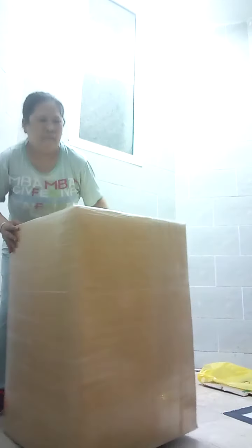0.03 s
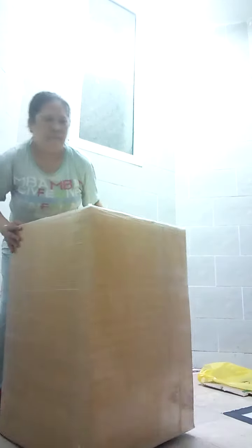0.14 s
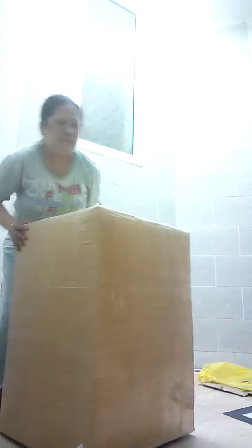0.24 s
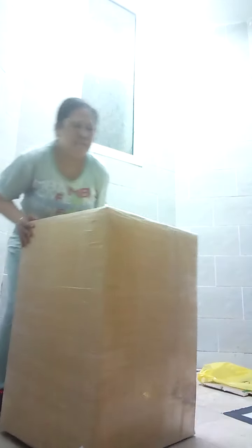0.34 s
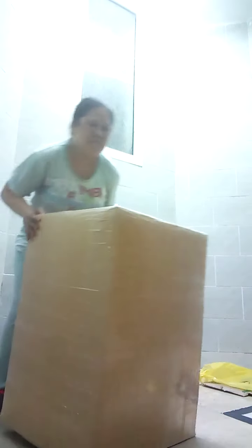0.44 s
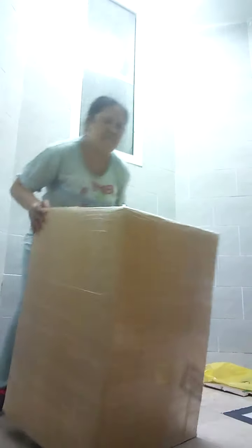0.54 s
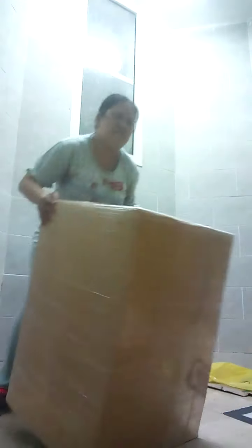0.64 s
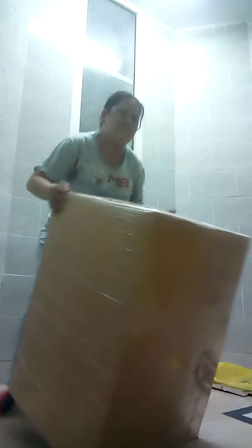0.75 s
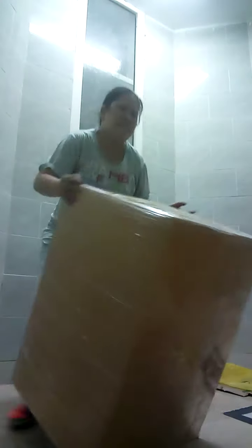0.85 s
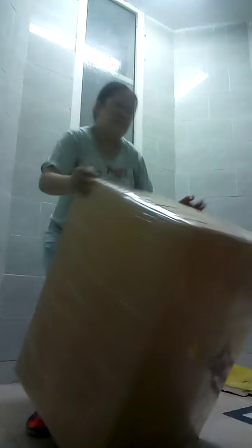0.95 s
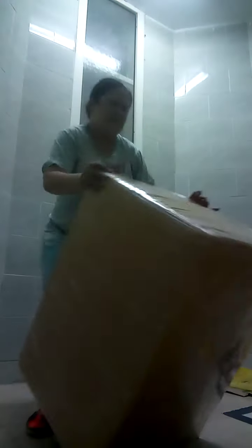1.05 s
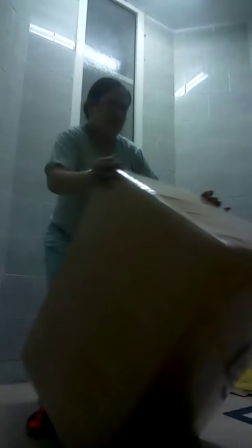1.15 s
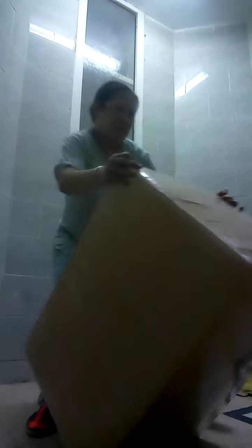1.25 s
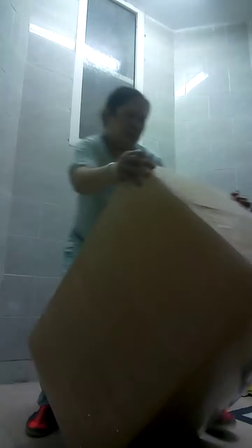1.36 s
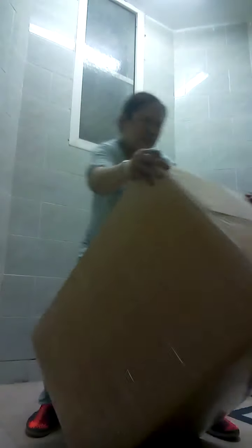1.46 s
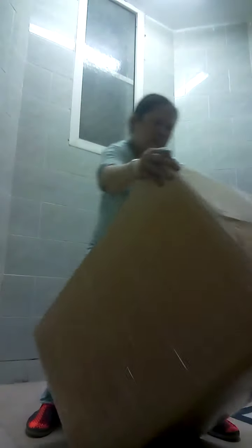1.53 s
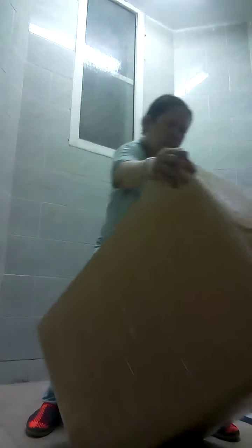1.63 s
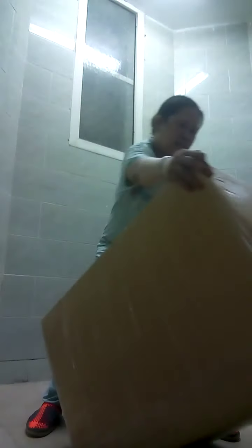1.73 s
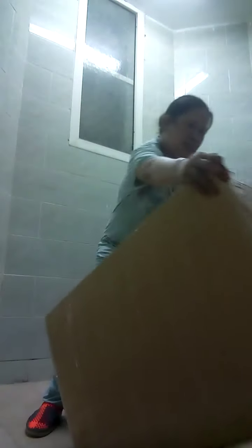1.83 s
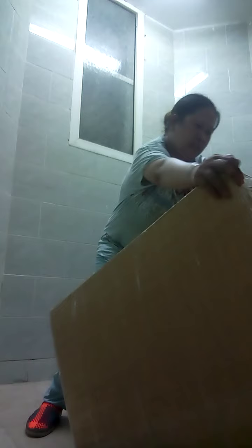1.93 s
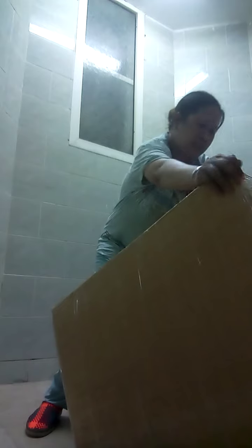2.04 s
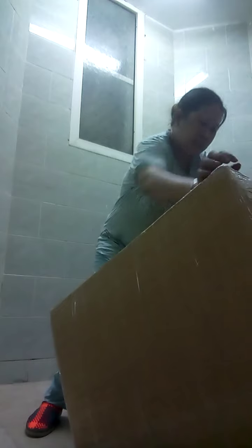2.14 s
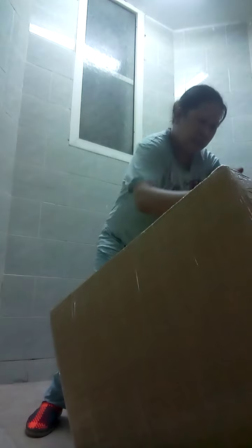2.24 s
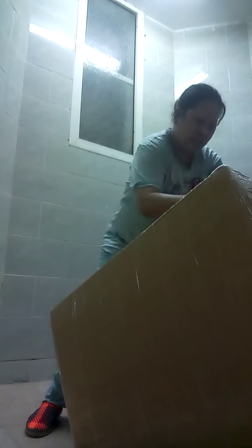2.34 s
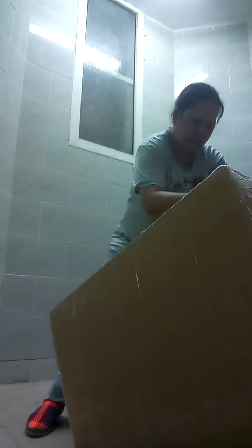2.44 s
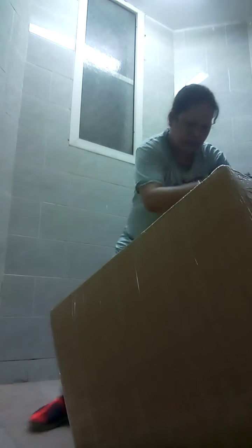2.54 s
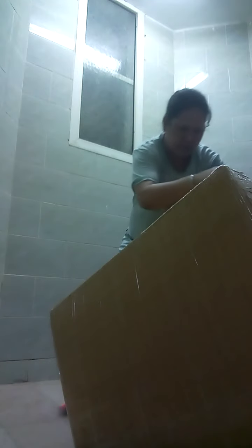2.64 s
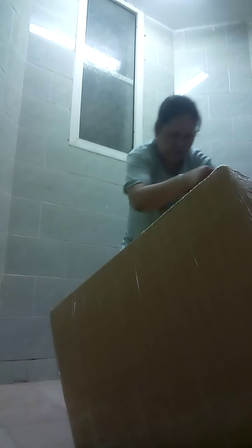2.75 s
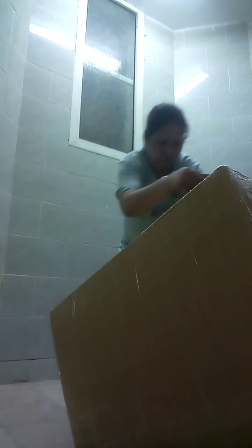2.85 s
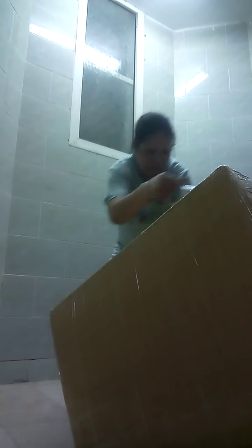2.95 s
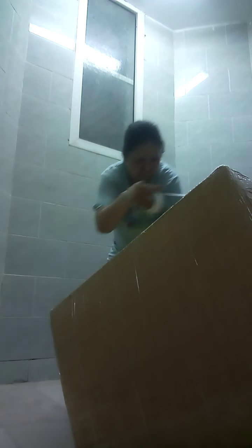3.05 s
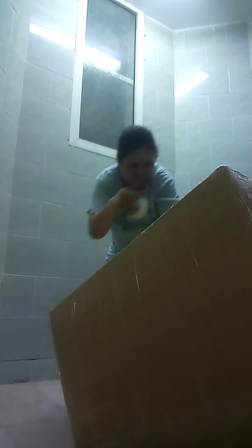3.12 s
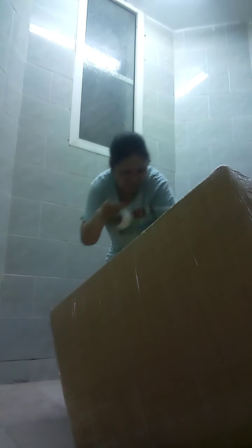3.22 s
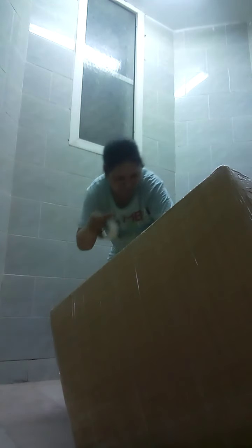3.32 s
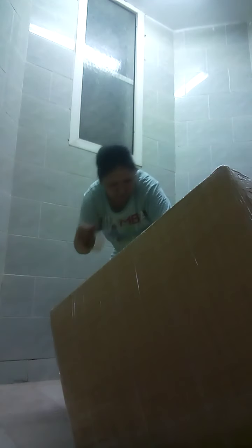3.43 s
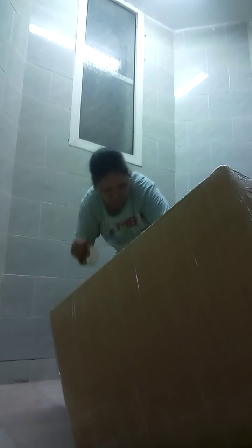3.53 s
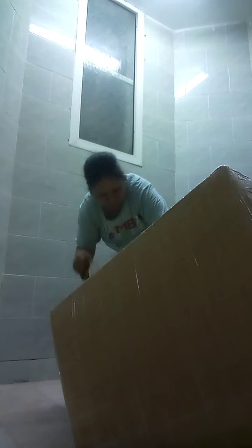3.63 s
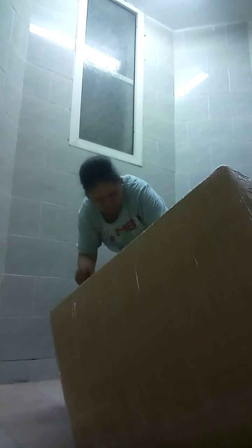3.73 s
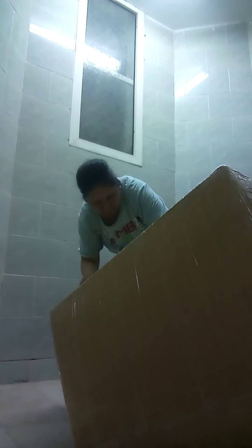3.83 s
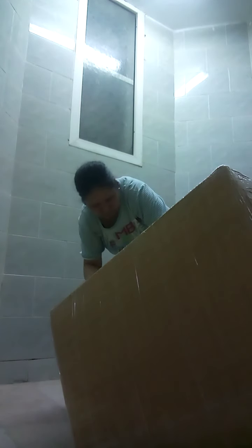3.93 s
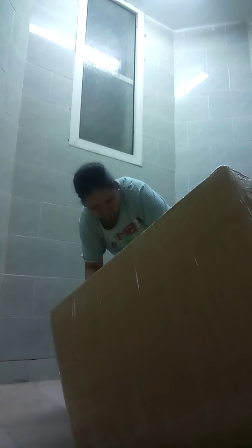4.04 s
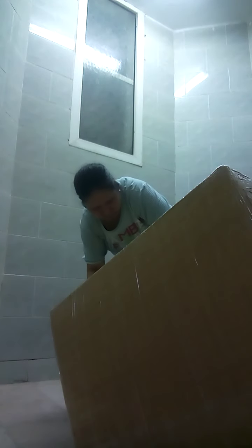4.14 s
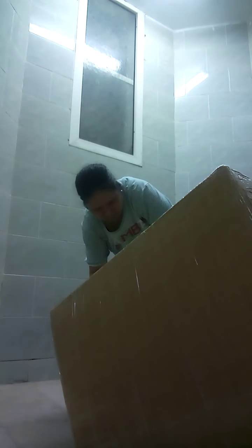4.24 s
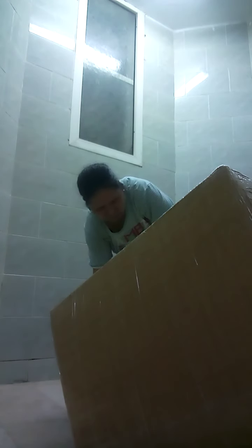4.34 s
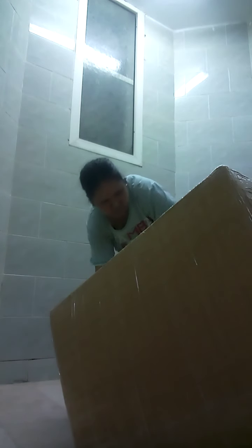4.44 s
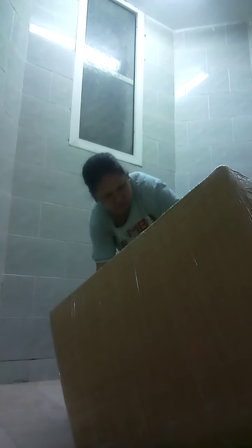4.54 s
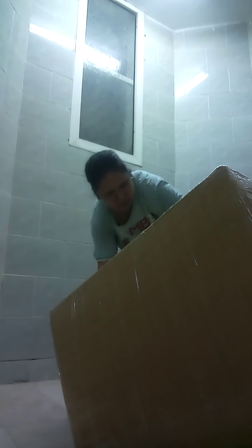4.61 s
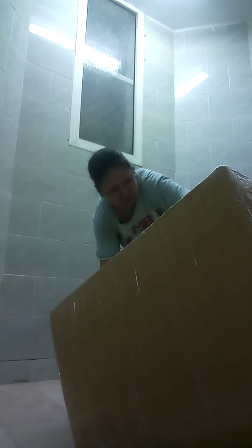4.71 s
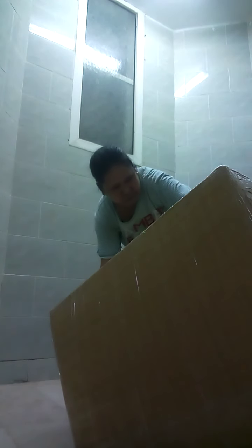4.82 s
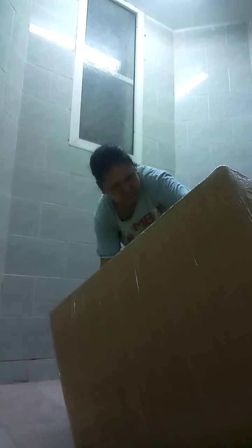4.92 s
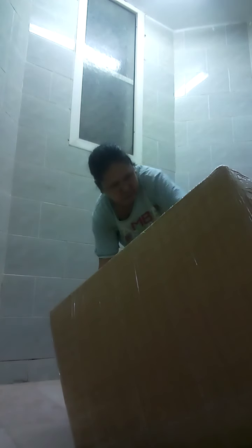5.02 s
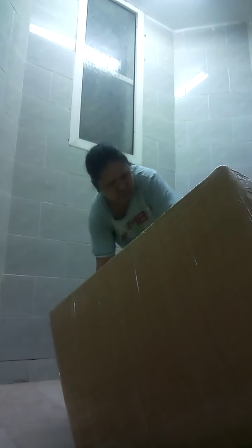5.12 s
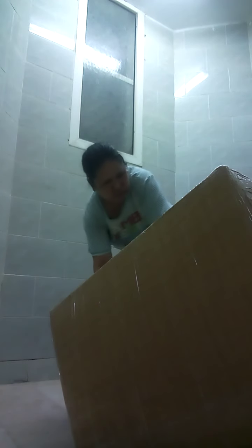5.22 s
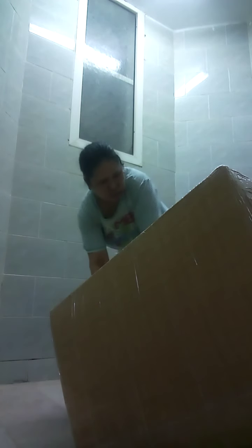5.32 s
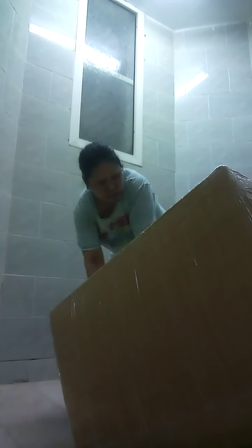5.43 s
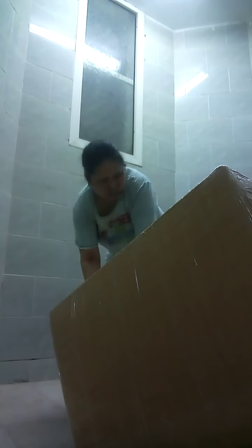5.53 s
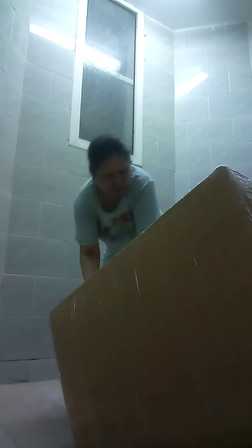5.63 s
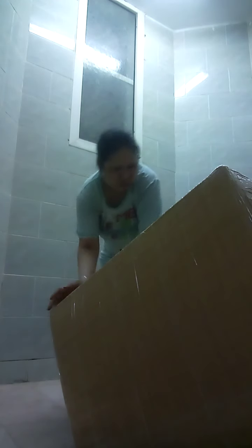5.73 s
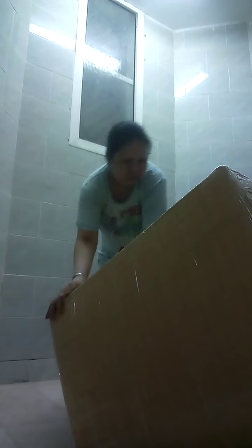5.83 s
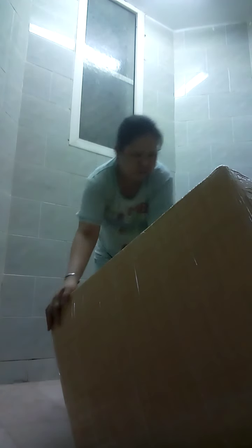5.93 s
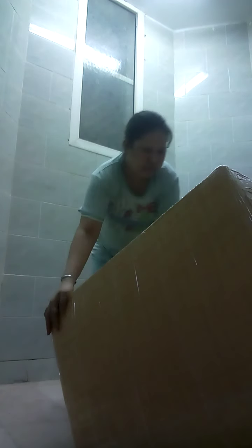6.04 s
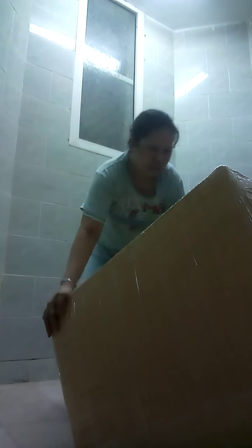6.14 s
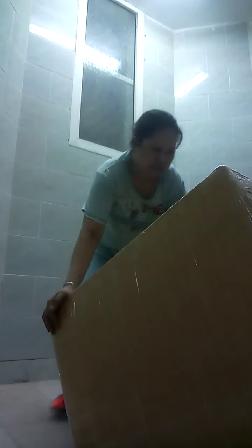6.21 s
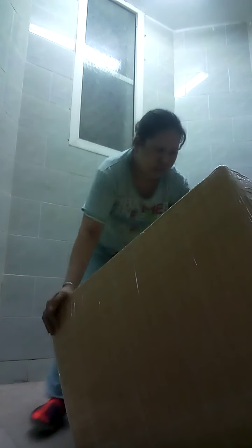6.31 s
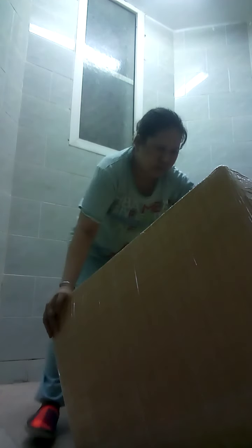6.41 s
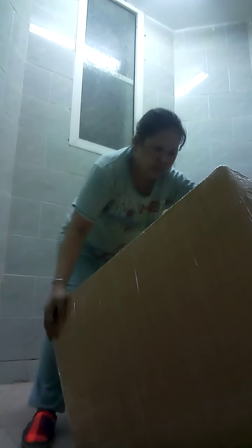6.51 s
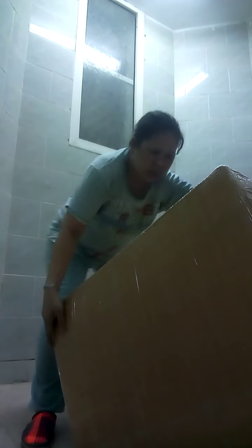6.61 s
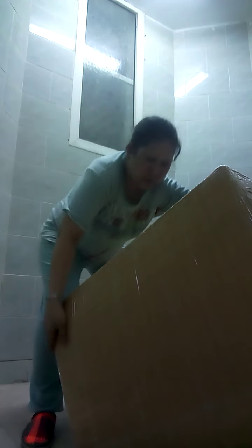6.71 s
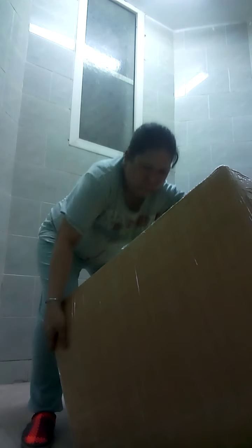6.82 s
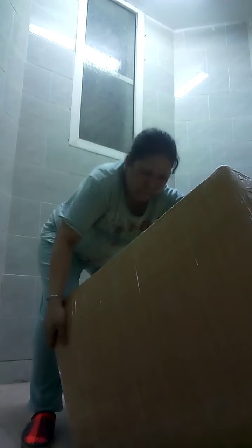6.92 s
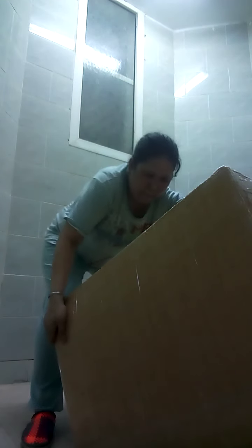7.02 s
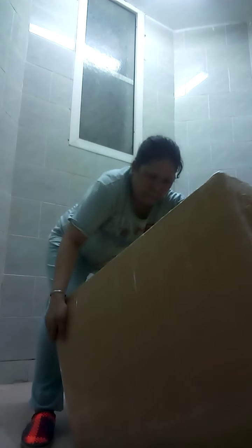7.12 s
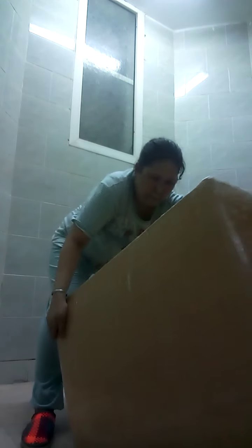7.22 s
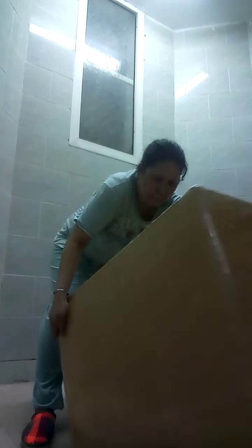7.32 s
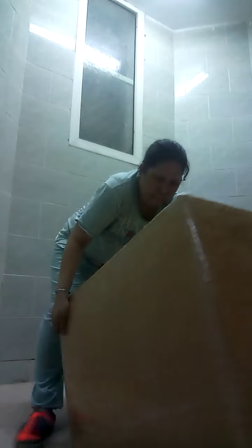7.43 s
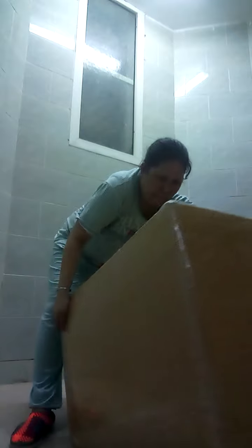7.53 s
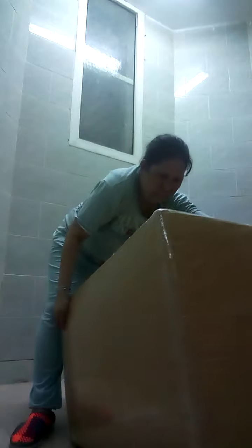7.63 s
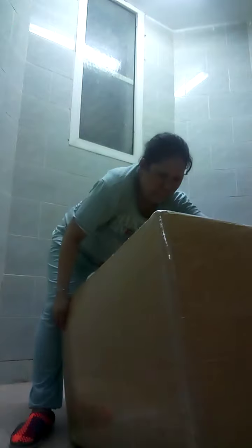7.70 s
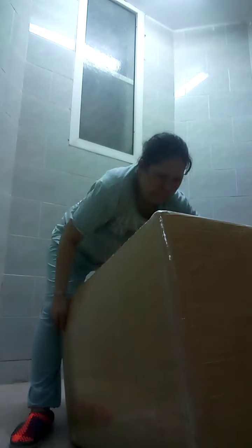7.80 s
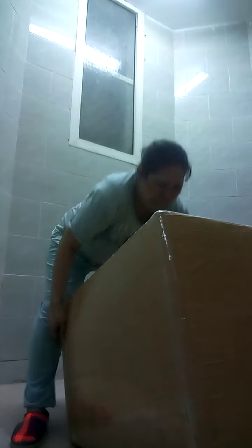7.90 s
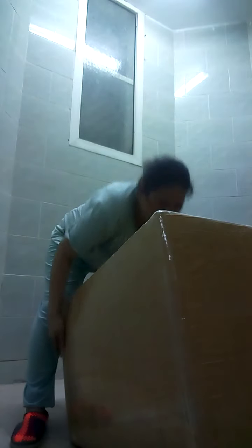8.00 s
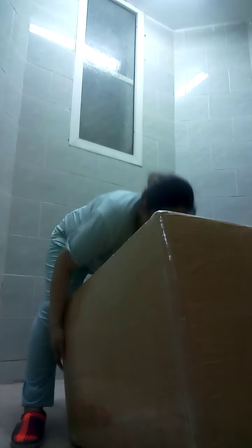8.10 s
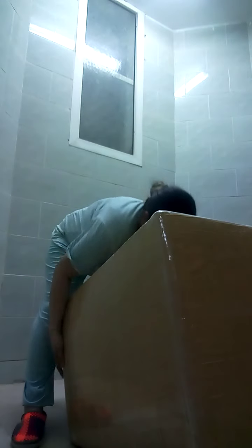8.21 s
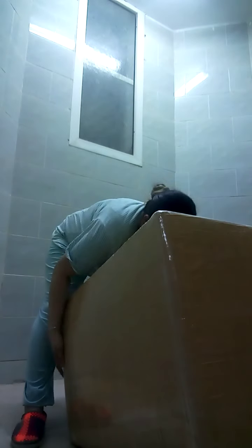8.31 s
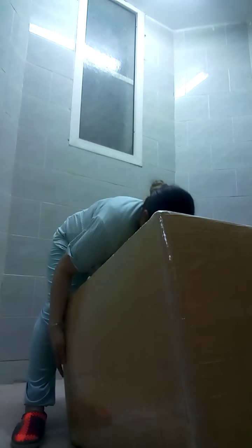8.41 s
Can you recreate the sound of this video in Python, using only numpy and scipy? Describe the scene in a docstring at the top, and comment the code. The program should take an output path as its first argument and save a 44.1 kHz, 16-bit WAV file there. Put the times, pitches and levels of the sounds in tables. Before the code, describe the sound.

A big cardboard box thumps down in an echoing tiled room, packing tape screeches off a roll, then hands rub and drag the box.

```python
"""A big tape-wrapped cardboard box is tipped over in a hard tiled room; its edge thumps on the floor
and rings the hollow card. Packing tape then screeches off the roll by stick-slip, in one long and one
short pull, and a limiter ducks everything under it. Hands smooth the tape down, so the film hisses and
crackles with friction, and at last the box is dragged round, its panels rumbling.
Throughout, the tiles reverberate and a low hum fills the room."""
import sys
import numpy as np
from scipy import signal
from scipy.fft import rfft, irfft, next_fast_len
from scipy.io import wavfile
from scipy.ndimage import uniform_filter1d, map_coordinates

SR = 44100
rng = np.random.default_rng(int(sys.argv[2]) if len(sys.argv) > 2 else 0)


def dump(signal):
    """Clip the signal to [-1, 1] and save it as 16-bit WAV at the path in sys.argv[1]."""
    limited = np.clip(np.atleast_2d(signal).T, -1, 1)
    pcm = np.round(limited * 32767).astype(np.int16)
    wavfile.write(sys.argv[1], SR, pcm)


N = 373086
TIME = np.arange(N) / SR

# Spectrum of the plastic film, rubbed or cracking. Each row: frequency in Hz, level in dB.
FILM_SPECTRUM = [(800, -58), (2000, -8.5), (3500, -2.5), (6500, 0.5), (10000, 1), (16000, 0.5)]


def tape(slips_per_s=1300, half_rate_m=0.19, wave_m_per_s=108, sizzle_hz=10000):
    """Stick-slip: glue lets go in uneven jumps; a longer strip slips more slowly and rings lower."""
    # Spectrum of the tearing glue. Each row: frequency in Hz, level in dB.
    glue_spectrum = [(100, 1.5), (300, 6.5), (700, 3.5), (1500, 2.5), (2500, 1.5), (4000, 1), (7000, 1),
                     (11000, 1), (16000, 1)]
    # The tape jerks free. Each row: time in seconds, level in dB.
    jerks = [(2.851, -7), (3.331, -3), (3.343, 0), (3.366, -6), (3.379, -3), (3.394, -6), (3.412, -21),
             (3.421, -6), (3.4555, 3), (3.458, -6.5), (3.575, -6.5), (3.678, -9), (3.781, -12),
             (4.0305, -7), (4.05, -19), (4.129, -2.5)]
    pull_db, strip_m, _ = pulling(TIME)
    slip_rate = slips_per_s / (1 + (strip_m / half_rate_m) ** 2)
    scatter = np.exp(0.3 * wobble(300) + 0.2 * wobble(12))
    count = np.floor(np.cumsum(slip_rate * scatter) / SR)
    slips = np.diff(count, prepend=0) * amp(5.3 * np.clip(rng.standard_normal(N), -2, 2))
    # Each slip tears a short row of glue threads.
    tearing = signal.lfilter([1], [1, -np.exp(-1 / (0.00055 * SR))], slips) * rng.standard_normal(N)
    fizz = grains(rate=8000, spread_db=4.0)
    peel = coloured(unit(tearing) + fizz, glue_spectrum) * amp(pull_db + 1.14 * wobble(70))
    hz, t, spectra = signal.stft(peel + snaps(jerks, decay_s=0.031), SR, nperseg=512, noverlap=384)
    _, strip_m, sizzle_db = pulling(t)
    order = hz[:, None] * 2 * strip_m / wave_m_per_s  # standing waves lie at whole numbers
    radiated = order ** 3 / np.sqrt(order ** 6 + 3)
    modes_db = 4.5 * np.cos(2 * np.pi * order) * np.exp(-order / 4)  # upper modes blur together
    strip = radiated * amp(modes_db) + 0.23  # some sound bypasses the strip
    treble = hz[:, None] ** 8 / (hz[:, None] ** 8 + sizzle_hz ** 8)
    return signal.istft(spectra * strip * amp(treble * sizzle_db), SR, nperseg=512, noverlap=384)[1][:N]


def pulling(t, grab_s=0.0057, sag_db_per_s=9.5):
    """The free strip grows at hand speed until the pull fades: level dB, length m and sizzle dB at t."""
    # Pulls on the tape. Each row: start in seconds, steady time in seconds, level in dB, fade in dB per
    # second, starting strip length in metres, hand speed in metres per second, sizzle in dB.
    pulls = np.array([(2.422, 0.0043, -30.5, 508, 0.048, 0.071, -9), (2.465, .87, -6, 80, .048, .37, 0.5),
                      (3.81, .05, -37.5, 232, 0.35, 0.017, -2), (4.03, .012, -21.5, 327, .008, .01, -8.5),
                      (4.145, 0.17, -31.5, 85, .065, .5, 3)])
    latest = np.maximum(np.searchsorted(pulls[:, 0], t, "right") - 1, 0)
    start, steady, db, fade, strip_m, speed, sizzle_db = pulls[latest].T
    age = np.maximum(t - start, 0)
    faded_db = fade * np.maximum(age - steady, 0)
    grab_db = 20 * np.log10(np.clip(age / grab_s, 1e-6, 1))  # the glue starts to give
    level_db = db + grab_db - sag_db_per_s * age - faded_db  # the arm tires as it stretches out
    length_m = strip_m + speed * np.minimum(age, steady)
    return level_db, length_m, sizzle_db + 0.26 * np.minimum(faded_db, 40)


def roll(peel, centre_hz=750, width_hz=380):
    """Forced resonance: while the strip is short, its slips make the roll's hollow card core rasp."""
    # Rasps of the core. Each row: start in seconds, length in seconds, level against the peel in dB.
    rasps = [(2.736, 0.12, -3), (4.153, 0.027, 5.5)]
    share = sum(amp(db) * gesture(s, 0.0083, length, fade_db_per_s=137) for s, length, db in rasps)
    core = lambda hz: (1j * hz * width_hz / (centre_hz ** 2 - hz ** 2 + 1j * hz * width_hz)) ** 2
    return filtered(peel * share, core)


def rubbing(rise_share=0.19, hand_rumble_db=-15):
    """Sliding friction: under strokes and skids the film hisses, card scrapes and the panels rumble."""
    # A hand strokes the wrapping. Each row: start in seconds, length in seconds, level in dB,
    # card scrape against film hiss in dB.
    strokes = [(0.04, 0.44, -49.5, -5), (0.38, 0.28, -50.5, -11), (0.83, 0.25, -54, -6),
               (1.276, 0.035, -55.5, -7), (1.47, 0.063, -61, -12), (2.282, 0.14, -50.5, -14.5),
               (4.569, 0.19, -53.5, -9), (4.936, 0.44, -46, -11), (5.378, 0.43, -48, -11),
               (5.861, .17, -45, -15.5), (6.377, 0.077, -52, -13), (6.494, 0.15, -48.5, -12),
               (6.692, 0.39, -47, -12), (7.587, 0.22, -47, -12), (7.866, 0.13, -51, -8.5),
               (8.204, 0.082, -58, -3.5)]
    # The box skids on the floor; the first row, at 0 s, is a brief rush already fading as the sound begins.
    # Each row: start, rise and length in seconds, level in dB, card scrape against film hiss in dB.
    skids = [(0.0, 0.001, 0.0051, -36, -4), (0.754, 0.057, 0.093, -45.5, -1.5),
             (1.817, 0.014, 0.074, -37, -8), (6.99, 0.27, 0.57, -36, -14.5), (7.49, 0.019, 0.06, -35, -16)]
    # Panels flex under the box's weight. Each row: start in seconds, length in seconds, level in dB.
    flexes = [(0.105, 0.49, -56), (0.747, 0.078, -49.5), (1.2, 0.13, -55.5), (1.92, 0.38, -59.5),
              (4.522, 0.16, -53), (5.037, 0.31, -52), (6.387, 0.027, -57), (6.964, 0.14, -46.5),
              (7.105, 0.43, -44.5), (7.72, 0.074, -52.5)]
    # Spectra of scraped card and of the big panels. Each row: frequency in Hz, level in dB.
    card_spectrum = [(200, -2.5), (500, 0.5), (900, -1.5), (1500, 2.5), (3000, -0.5), (6000, -12),
                     (16000, -35)]
    panel_spectrum = [(50, -23), (100, 0), (180, 1), (330, 1), (550, -10.5), (1000, -12.5), (3000, -87)]
    # The hand gathers speed, eases as it slides, and lifts off.
    hands = [(amp(db) * gesture(s, rise_share * length, length, fade_db_per_s=200, sag_db_per_s=4), card)
             for s, length, db, card in strokes]
    floor = [(amp(db) * gesture(s, rise, length, fade_db_per_s=189), card)
             for s, rise, length, db, card in skids]
    flexing = sum(amp(db) * gesture(s, 0.013, length, fade_db_per_s=180) for s, length, db in flexes)
    pressing = amp(hand_rumble_db) * sum(gain for gain, _ in hands)
    film_gain = np.sqrt(sum(gain ** 2 for gain, _ in hands + floor))
    card_gain = np.sqrt(sum((gain * amp(card)) ** 2 for gain, card in hands + floor))
    grip = amp(1.22 * wobble(25))
    hiss = film_gain * coloured(grains(rate=3000, spread_db=0), FILM_SPECTRUM)
    scrape = card_gain * coloured(grains(rate=2500, spread_db=9.5), card_spectrum)
    rumble = np.hypot(flexing, pressing) * coloured(grains(rate=600, spread_db=4.0), panel_spectrum)
    return grip * (hiss + scrape) + rumble


def thumps(attack_s=0.001):
    """Modal ringing: each blow excites the damped modes of the hollow box."""
    # The box bumps on the floor or under a hand. Each row: time in seconds, level in dB.
    blows = [(0.801, -43), (1.579, -41), (1.819, -19.5), (1.829, -23), (3.455, -30), (4.551, -41),
             (4.79, -53), (6.429, -44), (7.131, -38), (7.17, -36), (7.466, -36.5)]
    # Modes of the box. Each row: frequency in Hz, level in dB, time to fall 60 dB in seconds.
    modes = [(96.5, -27, 0.22), (147.4, -2.5, 0.21), (190, -2, 0.072), (247.2, 4.5, 0.061), (328, 5, 0.041),
             (496, -7, 0.028), (730, 13, 0.0036)]
    track, t = np.zeros(N), np.arange(SR // 2) / SR
    for s, db in blows:
        ring = sum(amp(db + mode_db + rng.normal(0, 1) - 60 * t / t60) * np.sin(2 * np.pi * hz * t)
                   for hz, mode_db, t60 in modes)
        add(track, s, ring * (1 - np.exp(-t / attack_s)))
    return track


def cracks():
    """Broadband transients: the wrapping and the card tick as the box flexes."""
    # Single ticks. Each row: time in seconds, level in dB.
    ticks = [(0.2806, -37), (0.4219, -33.5), (0.6493, -38), (1.258, -37), (1.6841, -43), (1.747, -36.5),
             (1.791, -35), (1.833, -32), (1.991, -28), (2.2817, -35.5), (5.7018, -30), (6.1703, -42),
             (7.211, -17.5), (7.5302, -26), (8.1952, -35.5)]
    return filtered(snaps(ticks, decay_s=0.018), lambda hz: amp(along(FILM_SPECTRUM, hz)))


def crumples(half_width_octaves=0.78):
    """Crackling noise: each press of a hand sets off a flurry in the wrapping, around its own pitch."""
    # Presses. Each row: start in seconds, level in dB, time to the crest in seconds, centre in Hz.
    presses = [(1.041, -51.5, 0.0021, 3170), (1.33, -50, 0.0024, 4000), (1.483, -54, 0.0021, 4000),
               (1.746, -52, 0.013, 7000), (1.831, -31, 0.0051, 6000), (1.888, -33, .0015, 3830),
               (1.972, -37.5, 0.0026, 7300), (4.715, -45, 0.015, 8900), (5.191, -46.5, 0.024, 6600),
               (5.47, -47.5, 0.021, 5130), (5.703, -37, 0.013, 10700), (5.871, -50, 0.018, 4500),
               (6.02, -48.5, 0.018, 4200), (7.234, -30, 0.0049, 9450)]
    track, t = np.zeros(N), np.arange(SR // 4) / SR
    for s, db, crest, centre_hz in presses:
        crackles = rng.standard_normal(len(t)) * amp(2.7 * rng.standard_normal(len(t)))
        band = lambda hz: 1 / (1 + (np.log2((hz + 1) / centre_hz) / half_width_octaves) ** 4)
        flurry = unit(filtered(crackles, band))
        add(track, s, amp(db) * flurry * t / crest * np.exp(1 - t / crest))
    return track


def direct(x, left_db=-5, lag_s=0.0004884):
    """Path difference: the straight sound reaches the left microphone first, but fainter."""
    return np.array([amp(left_db) * x, delayed(x, lag_s)])


def room(x, tail_count=14, block=4410):
    """Reverberation: the tiles echo for about a second, differently as the box and hands move."""
    # Decay of the tiled room. Each row: frequency in Hz, time to fall 60 dB in seconds.
    decay_times = [(80, 0.9), (300, 0.75), (1000, 0.97), (4000, 0.9), (8000, 0.67), (16000, 0.46)]
    noise = diffuse(tail_count * SR).reshape(2, tail_count, SR)
    hz, t, spectra = signal.stft(noise, SR, nperseg=512)
    tails = signal.istft(spectra * amp(-60 * t / along(decay_times, hz)[:, None]), SR, nperseg=512)[1]
    tails = tails / np.linalg.norm(tails[0, 0])
    wet = np.zeros((2, N))
    for k, first in enumerate(range(0, N, block)):  # each block takes the next tail
        for side in (0, 1):
            echoes = signal.fftconvolve(x[first:first + block], tails[side, k % tail_count])
            add(wet[side], first / SR, echoes)
    return wet


def background():
    """Modulated partials: a low hum wavers, and swells once, over soft diffuse room noise."""
    # Partials of the hum. Each row: frequency in Hz, level in dB.
    partials = [(77, -55), (96, -61), (119, -55.5), (177, -63.5), (237, -65.5)]
    # Spectrum of the room noise. Each row: frequency in Hz, level in dB.
    air_spectrum = [(20, -5), (45, -7), (62, -6), (78, 0), (100, -12.5), (135, -11), (170, -11), (260, -13),
                    (450, -20), (1000, -33), (4000, -29.5), (16000, -29.5)]
    swell = 1 + amp(-1.5) * gesture(4.74, rise=0.048, length=0.16, fade_db_per_s=300)
    hum = sum(amp(db + 2.45 * wobble(5.5)) * np.sqrt(2) * np.sin(2 * np.pi * hz * TIME + 1.03 * wobble(7))
              for hz, db in partials)
    return swell * hum + amp(-52) * coloured(diffuse(N), air_spectrum)


def diffuse(size, lag_s=0.00135):
    """Diffuse field: noise from all sides, coherent mainly in the bass, and later on the right."""
    # Likeness of left and right. Each row: frequency in Hz, correlation from 0 to 1.
    coherence = [(200, 0.81), (330, 0.9), (600, 0.21), (1200, 0.62), (2500, 0)]
    angle = lambda hz: np.arccos(np.clip(along(coherence, hz), -1, 1)) / 2
    shares = lambda hz: np.array([np.cos(angle(hz)), np.sin(angle(hz))])
    mid, side = filtered(rng.standard_normal((2, size)), shares)
    return np.array([mid + side, delayed(mid - side, lag_s)])


def gesture(start, rise, length, fade_db_per_s, sag_db_per_s=0):
    """Envelope of one movement: a linear rise, a hold that may sag, an exponential decay."""
    gain, t = np.zeros(N), TIME[:2 * SR]
    attack = np.minimum(t / max(rise, 1 / SR), 1)
    add(gain, max(start, 0), attack * amp(-sag_db_per_s * t - fade_db_per_s * np.maximum(t - length, 0)))
    return gain


def grains(rate, spread_db):
    """Shot noise: tiny slips of uneven size at random moments, rate a second on average."""
    slips = (rng.random(N) < rate / SR) * rng.standard_normal(N)
    return unit(slips * amp(spread_db * np.clip(rng.standard_normal(N), -2, 2)))


def snaps(rows, decay_s):
    """Impulsive noise: short bursts, whitened to hold all frequencies equally, then damped further."""
    track, t = np.zeros(N), np.arange(1024) / SR
    for s, db in rows:
        burst = amp(-60 * t / decay_s) * rng.standard_normal(len(t))
        flat = irfft(np.exp(1j * np.angle(rfft(burst))))
        add(track, s, amp(db) * np.linalg.norm(burst) * flat * amp(-20 * t / decay_s))
    return track


def wobble(rate):
    """A smooth random curve, rate knots a second."""
    return map_coordinates(rng.standard_normal(int(N * rate / SR) + 4), [TIME * rate])


def amp(db):
    """Decibels to gain."""
    return 10 ** (np.asarray(db) / 20)


def unit(x):
    """Scale to rms 1."""
    return x / np.sqrt(np.mean(x ** 2) + 1e-20)


def along(points, hz):
    """Interpolate (Hz, value) points on a log frequency axis."""
    knots_hz, values = np.transpose(points)
    return np.interp(np.log(hz + 1), np.log(knots_hz), values)


def filtered(x, response):
    """Linear filtering: the spectrum of x times a frequency response."""
    size = x.shape[-1]
    padded = next_fast_len(size + 8192)
    return irfft(rfft(x, padded) * response(np.fft.rfftfreq(padded, 1 / SR)), padded)[..., :size]


def delayed(x, lag_s):
    """A pure delay: phase lag proportional to frequency."""
    return filtered(x, lambda hz: np.exp(-2j * np.pi * hz * lag_s))


def coloured(x, spectrum):
    """Shape x by a (Hz, dB) spectrum, at rms 1."""
    return unit(filtered(x, lambda hz: amp(along(spectrum, hz))))


def add(track, s, sound):
    """Superpose a sound on the track at s seconds."""
    part = track[int(s * SR):][:len(sound)]
    part += sound[:len(part)]


def scene():
    """Acoustic shadow: the box hides tape and hands, heard mostly off the walls; its ticks are in view."""
    peel = tape()
    hidden = peel + roll(peel) + rubbing() + thumps()
    ticks = cracks() + crumples()
    return room(amp(-1) * hidden + amp(-5.5) * ticks) + direct(amp(-3) * hidden + ticks) + background()


def limiter(x, threshold_db=-19, slope=0.82, release_db_per_s=190, window_s=0.018, smooth_s=0.005):
    """Compression: both channels duck just before the right one gets loud, then recover steadily."""
    power = np.abs(uniform_filter1d(x[1] ** 2, int(window_s * SR)))
    cut_db = slope * np.maximum(10 * np.log10(power + 1e-12) - threshold_db, 0)
    held_db = np.maximum.accumulate(cut_db + release_db_per_s * TIME) - release_db_per_s * TIME
    return x * amp(-uniform_filter1d(held_db, int(smooth_s * SR)))


def record(dry, low_cut_hz=58, top_hz=15650):
    """Transduction: two unlike microphones colour the sound, with a bass cut, limiter and band limit."""
    # Response of both microphones. Each row: frequency in Hz, gain in dB.
    response = [(200, 0), (380, 2), (460, 5), (560, 3.5), (820, 6.5), (1130, -2.5), (1550, 2), (2000, 0.5),
                (3400, 4.5), (5600, 7), (6650, 9.5), (7400, 7), (8800, 6.5), (10500, 0.5), (13900, -1),
                (15000, 8.5)]
    # The left microphone is duller. Each row: frequency in Hz, further gain in dB.
    left_shade = [(60, -15), (92, -1.5), (140, -3.5), (210, -2.5), (330, -6), (500, -8), (770, -9.5),
                  (1170, 2.5), (1790, -2), (2740, -2.5), (4190, -7), (6410, -8), (9810, -11.5),
                  (15000, -32)]
    bass_cut = lambda hz: signal.freqs(*signal.butter(4, low_cut_hz, "high", analog=True), hz)[1]
    colour = lambda hz: amp(along(response, hz) + np.outer([1, 0], along(left_shade, hz)))
    heard = filtered(dry, lambda hz: bass_cut(hz) * colour(hz))
    return filtered(limiter(heard), lambda hz: 1 / np.sqrt(1 + (hz / top_hz) ** 300))


dry = scene()
out = record(dry)
dump(out)
```